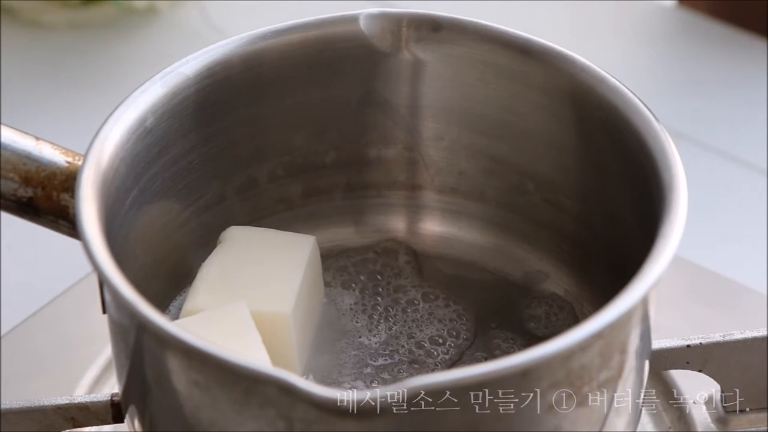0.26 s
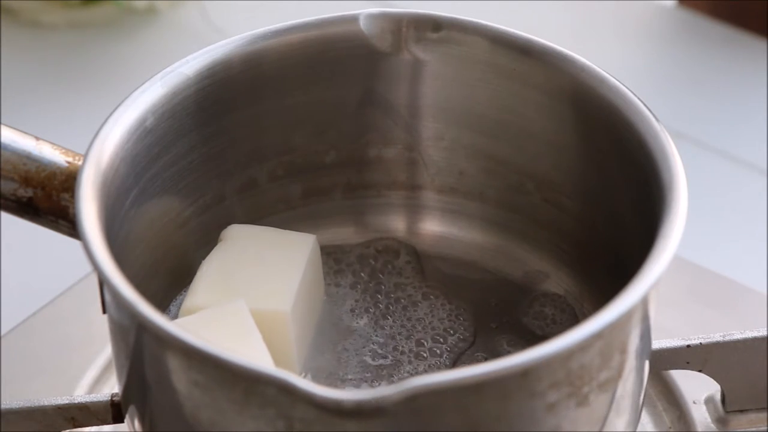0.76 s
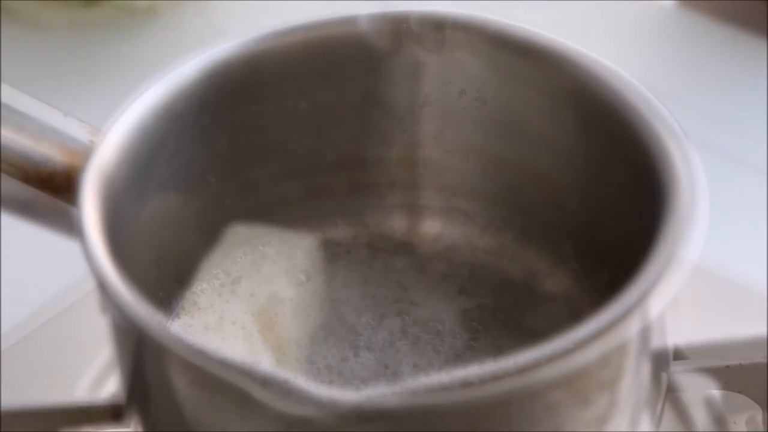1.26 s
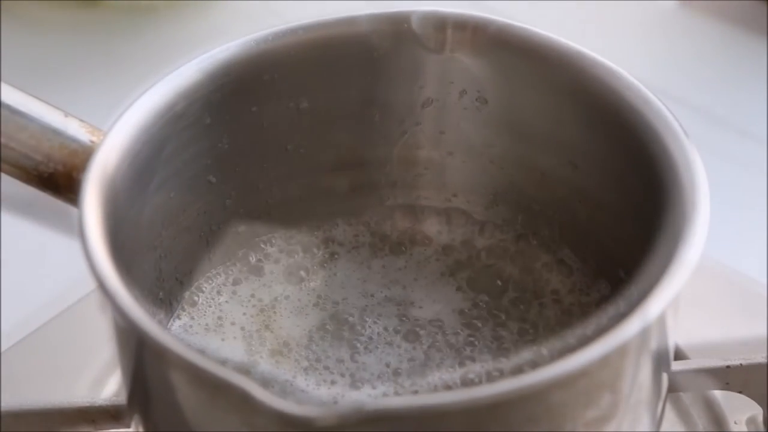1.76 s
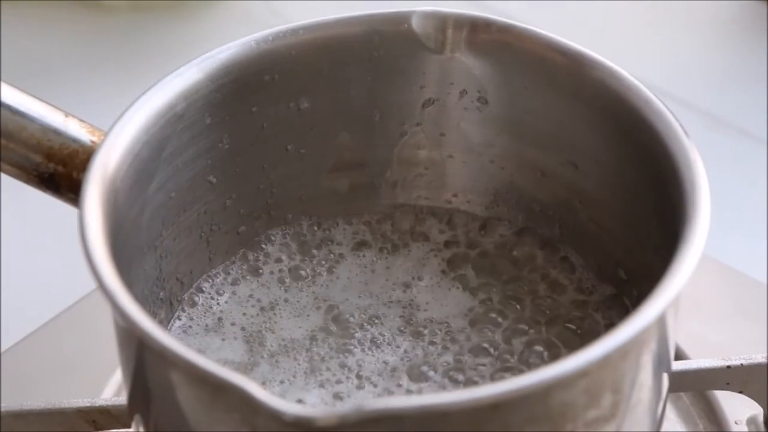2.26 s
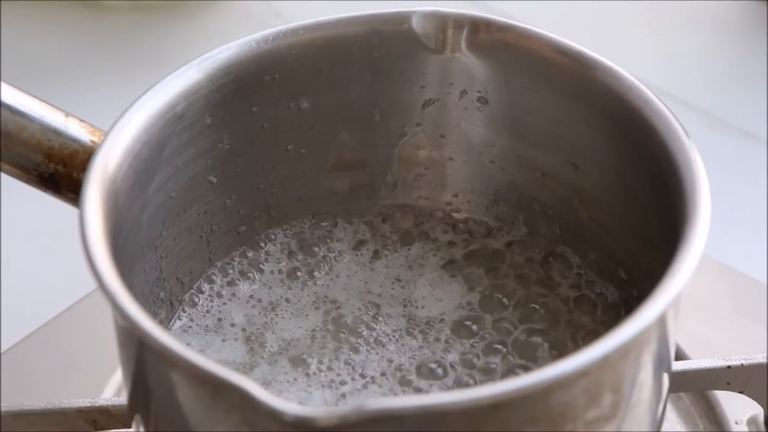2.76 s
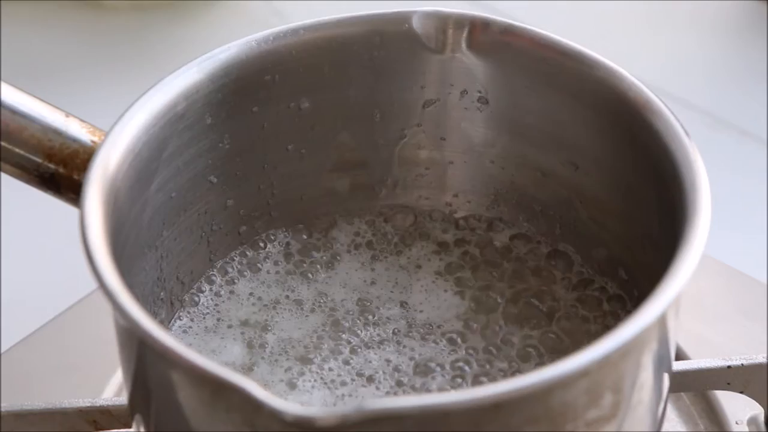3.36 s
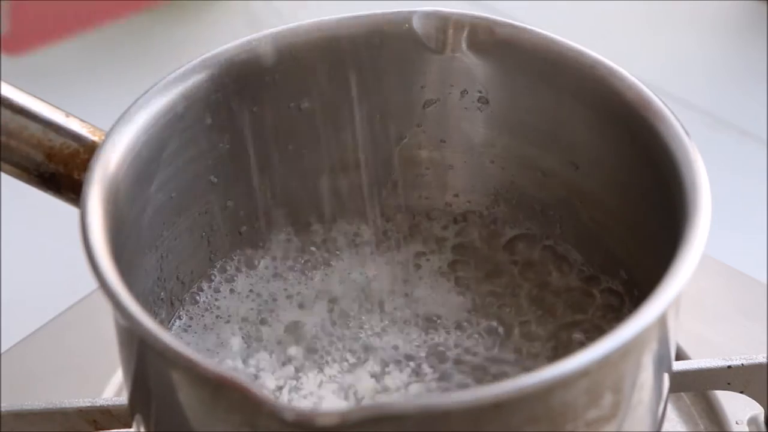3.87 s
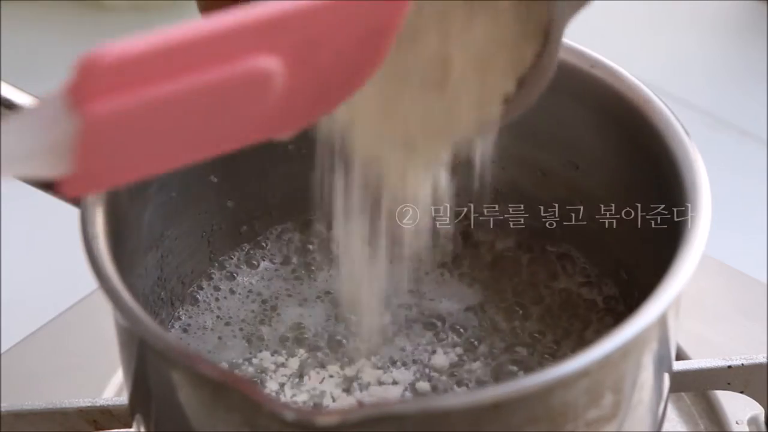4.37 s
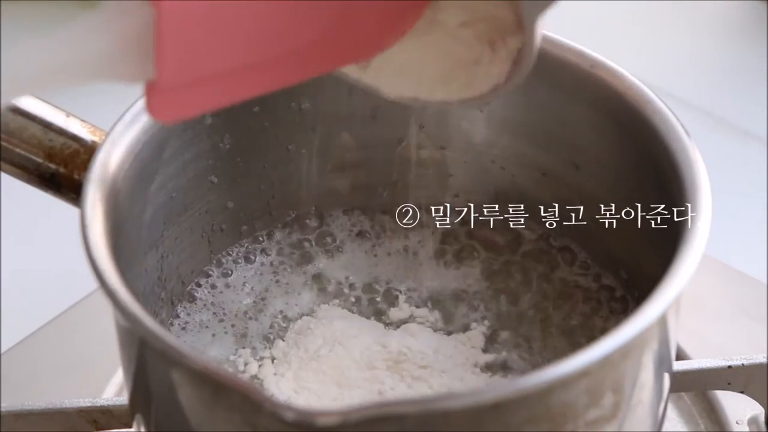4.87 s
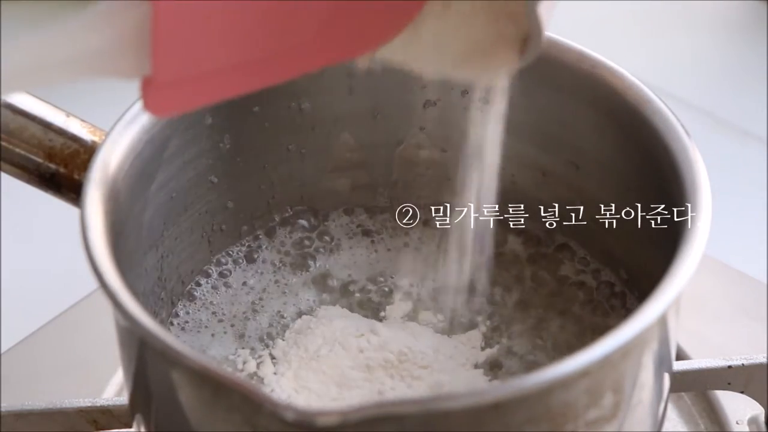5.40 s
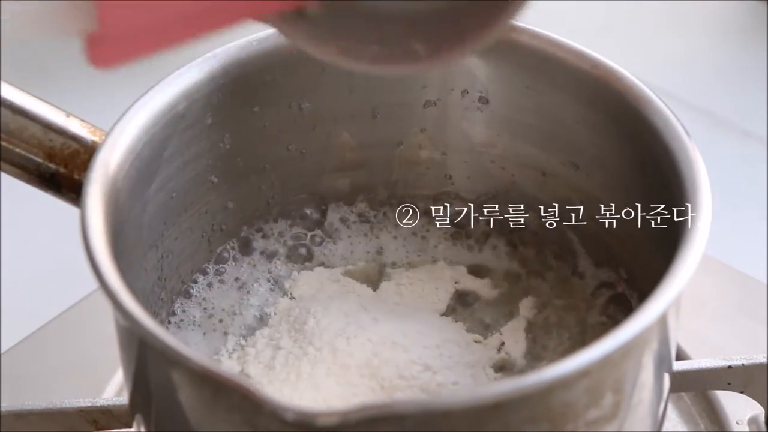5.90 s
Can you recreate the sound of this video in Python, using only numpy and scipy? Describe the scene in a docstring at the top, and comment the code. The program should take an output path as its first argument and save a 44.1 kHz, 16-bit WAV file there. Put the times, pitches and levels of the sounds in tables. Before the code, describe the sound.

Close, faint sizzling of melting butter builds to a busy bubbling fizz in a steel pan, with sharp spits and one light metal tick.

```python
"""In a kitchen, butter sizzles in a small steel saucepan on a stove, close to a stereo microphone.
A thin, spitting hiss of steam gives way to a growing foam. Each bursting bubble is a tiny tone,
and thousands of them make the hollow of the pan ring. Single pops, sharp spits, one tick of metal
and a few soft thuds stand out over the rush of the burner and the rumble of the house."""
import sys
import numpy as np
from scipy import signal
from scipy.fft import irfft
from scipy.io import wavfile
from scipy.ndimage import uniform_filter1d

SR = 44100
rng = np.random.default_rng(int(sys.argv[2]) if len(sys.argv) > 2 else 0)


def put_to_file(sound):
    """Save the sound as 16-bit audio at rate SR, in the file named by the first command-line argument."""
    columns = np.atleast_2d(sound).T  # one column per channel
    safe = np.clip(columns, -1, 1)
    whole_steps = np.round(safe * 32767)
    wavfile.write(sys.argv[1], SR, whole_steps.astype(np.int16))


N = 270774
TIME = np.arange(N) / SR

# How far the hiss and low rush have shifted from their thin opening tone to their fuller later tone.
# Each row: time in seconds, share of the later tone (0 to 1).
TONE_BLEND = [(0.9, 0.05), (2.0, 0.81)]
# Bubbles that stand out. Each row: time in seconds, peak level in dB, pitch in Hz.
POPS = [(0.3111, -46, 1920), (0.433, -46, 1700), (0.4337, -48.5, 740), (0.4385, -53, 3200),
        (0.6564, -47, 1800),  (0.8833, -56, 2030), (1.1215, -45, 3700), (1.1835, -47, 3760),
        (1.2926, -48, 3510), (1.3825, -49, 2170), (1.4337, -48, 3500), (1.4485, -39, 3510),
        (1.4492, -50, 2110), (1.483, -41, 4260), (1.5686, -41, 3430), (1.644, -38, 3920),
        (1.7115, -34.5, 3640), (1.7633, -38, 4400), (1.7684, -41, 2440), (1.8566, -46, 2310),
        (1.9545, -49, 1040), (2.008, -30, 4170), (2.0503, -34, 5600), (2.058, -26.5, 5360),
        (2.0846, -46, 3750), (2.184, -45, 2140), (2.218, -33, 4100), (2.3605, -42, 2370),
        (2.4655, -36, 2180), (2.5156, -29, 3430), (2.5221, -30, 3100), (2.6125, -46.5, 734),
        (2.6201, -40, 2310), (2.7971, -25, 3650), (2.814, -27.5, 3230), (2.817, -36, 2150),
        (2.8408, -46, 830), (2.933, -33.5, 1880), (2.9333, -46, 3370), (3.0935, -24, 3670),
        (3.0956, -22, 4100), (3.1876, -37, 820), (3.1873, -29, 2140), (3.2334, -30.5, 1780),
        (3.2333, -21.5, 3380), (3.2753, -25, 3400), (3.2738, -27, 5460), (3.3196, -26, 3370),
        (3.3268, -24.5, 3210), (3.3493, -38.5, 810), (3.351, -25.5, 2000), (3.4202, -25, 2950),
        (3.438, -30, 3500), (3.4493, -41, 3560), (3.5915, -29, 3220), (3.618, -30, 3900),
        (3.691, -25, 5600), (3.6932, -39, 2820), (3.7555, -22, 3760), (3.7663, -36.5, 696),
        (3.7754, -14.5, 3270), (3.7758, -24, 5050), (3.784, -37, 3240), (3.8054, -27, 3130),
        (3.8941, -30, 2900), (3.8944, -24, 1670), (3.8945, -31.5, 740), (3.914, -36, 3220),
        (3.9219, -44, 1790), (3.9895, -34, 7800), (3.999, -26.5, 3100), (4.026, -21, 3090),
        (4.0303, -26, 3200), (4.0396, -25, 3230), (4.1006, -27, 3030), (4.2133, -22, 3030),
        (4.2555, -26.5, 3400), (4.2924, -28, 1840), (4.3003, -28, 3270), (4.3184, -37, 3160),
        (4.3404, -27, 3530), (4.3459, -42, 3650), (4.4286, -26, 3780), (4.4499, -38, 650),
        (4.4731, -24, 3700), (4.4752, -23.5, 2810), (4.478, -19, 3150), (4.5096, -23, 3260),
        (4.5156, -30, 3250), (4.5395, -41, 970), (4.5417, -21.5, 2030), (4.5458, -22.5, 1900),
        (4.587, -35, 1230), (4.59, -32, 1750), (4.6161, -21, 3870), (4.683, -29, 3360), (4.6902, -36, 3120),
        (4.7227, -28, 3180), (4.718, -33, 5910), (4.7858, -24.5, 3040), (4.7882, -34, 7940),
        (4.8122, -23, 3240), (4.8318, -24, 3400), (4.86, -25, 3100), (4.934, -24.5, 2960),
        (4.942, -33, 2370), (5.0325, -24.5, 3750), (5.1317, -41, 3180), (5.1614, -28, 3030),
        (5.1683, -30, 2230), (5.1898, -28, 3330), (5.231, -24.5, 3660), (5.3183, -35, 2600),
        (5.329, -26, 3120), (5.3964, -25, 3220), (5.503, -23, 3600), (5.54, -30, 3200), (5.545, -33, 690),
        (5.635, -29, 3200), (5.6443, -30, 3100), (5.669, -25, 2240), (5.678, -38, 920), (5.794, -25, 2160),
        (5.946, -24, 2960), (5.967, -23, 2360), (5.9717, -37.5, 840), (5.9874, -17.5, 3400),
        (5.9946, -22, 3600), (6.102, -23, 2110), (6.1117, -28, 3240)]


def gain_of(db):
    """Turn decibels into a factor to multiply a sound by."""
    return 10 ** (np.asarray(db) / 20)


def add_power(db, power):
    """The level in dB once extra power is added."""
    return 10 * np.log10(gain_of(db) ** 2 + power)


def unit_level(x):
    """Scale a signal to an average power of 1."""
    return x / np.sqrt(np.mean(x ** 2) + 1e-20)


def at_pitch(rows, hz):
    """Read a table of (Hz, value) rows at any pitch."""
    row_hz, value = np.transpose(rows)
    return np.interp(np.log(hz + 1), np.log(row_hz + 1), value)


def curves(rows, t=TIME):
    """Join rows that start with a time into one curve for each other column."""
    times, *columns = np.transpose(rows)
    return [np.interp(t, times, column) for column in columns]


def frame_grid(size):
    """Times and pitches for overlapping slices of sound, each `size` samples long."""
    return np.arange(N // (size // 4) + 5) * size / 4 / SR, np.fft.rfftfreq(size, 1 / SR)


def stereo_noise(strength, size):
    """Noise with a given strength at each pitch (rows) and moment (columns)."""
    # Each row: pitch in Hz, how alike left and right are (0 to 1).
    likeness = [(60, 1), (150, 0.61), (380, 0.91), (950, 0.84), (2380, 0.48), (5980, 0.056), (15000, 0.013)]
    alike = at_pitch(likeness, np.fft.rfftfreq(size, 1 / SR))[:, None]
    a, b, c, d = rng.standard_normal((*strength.T.shape, 4)).T
    left = a + 1j * b
    right = alike * left + np.sqrt(1 - alike ** 2) * (c + 1j * d)
    spectrum = np.array([left, right]) * strength
    return signal.istft(spectrum, nperseg=size, noverlap=size * 3 // 4)[1][:, :N]


def patchy_noise(opening_tone, later_tone, patchy_db, size):
    """Noise with drifting patches; it shifts from its opening tone toward its later tone."""
    t, hz = frame_grid(size)
    patches = rng.standard_normal((len(t), len(hz))).T
    patches = unit_level(uniform_filter1d(uniform_filter1d(patches, 8, 0), 10, 1))
    blend = curves(TONE_BLEND, t)[0]
    opening, later = (unit_level(gain_of(at_pitch(tone, hz)))[:, None] for tone in (opening_tone, later_tone))
    power = (1 - blend) * opening ** 2 + blend * later ** 2
    return unit_level(stereo_noise(np.sqrt(power) * gain_of(patchy_db * patches), size))


def puff_power(t, start, db, fade_s, rise_s=0.0012):
    """The power of a puff that swells quickly, then drops 60 dB in fade_s."""
    age = np.maximum(t - start, 0)
    return (1 - np.exp(-age / rise_s)) * gain_of(db - 60 * age / fade_s) ** 2


def bursts(start, db, hz, cycles, balance_db, lag_s, size, glide=0.022):
    """Tiny tones that peak after `cycles` swings and glide upward; one side hears each a little later."""
    out, step = np.zeros((2, N)), np.arange(size)
    samples = np.floor(start * SR).astype(int)[:, None] - 8 + step
    end_fade = np.minimum((size - step) / 20, 1)
    for side, sign in enumerate((.5, -.5)):
        swings = np.maximum(samples / SR - (start + sign * lag_s)[:, None], 0) * hz[:, None]
        progress = swings / cycles
        swell = (progress * np.exp(1 - progress)) ** 2 * end_fade
        tone = np.sin(2 * np.pi * swings * (1 + glide * progress))
        wave = swell * tone * gain_of(db + sign * balance_db)[:, None]
        out[side] = np.bincount(np.maximum(samples, 0).ravel(), wave.ravel(), N)[:N]
    return out


def placed_bursts(peak_s, db, hz, cycles, size):
    """Bursts that peak at the given times, each at a random place in the pan."""
    place = rng.standard_normal((len(peak_s), 2))
    start = peak_s - np.ravel(cycles) / hz
    return bursts(start, db, hz, cycles, 1.4 * place[:, 0], 2e-5 * place[:, 1], size)


def swarm(level_db, lowest_hz, spread, cycles, uneven_db, clump, count, size):
    """A crowd of bubbles that ring at lowest_hz or above and come in clumps as the foam heaves."""
    pick = rng.random(count)
    smallness, strength = rng.exponential(1, (count, 2)).T
    place = rng.standard_normal((count, 2))
    t = np.arange(0, N / SR, 1e-3)
    heave = unit_level(sum(np.sin(2 * np.pi * (hz * t + rng.random())) for hz in np.geomspace(8, 60, 30)))
    burst_so_far = np.cumsum(np.exp(clump * heave))
    start = np.interp(pick, burst_so_far / burst_so_far[-1], t)
    floor_hz = np.broadcast_to(lowest_hz, N)[(start * SR).astype(int)]
    hz = np.minimum(floor_hz * np.exp(spread * smallness), 15000)
    db = uneven_db * np.minimum(strength, 3.5)
    db -= 2.5 * np.maximum(smallness - 1.5, 0)  # the smallest bubbles are fainter
    crowd = bursts(start, db, hz, cycles, 3.9 * place[:, 0], 4.5e-5 * place[:, 1], size)
    return unit_level(crowd) * gain_of(level_db)


def house_rumble():
    """The deep noise of the house."""
    # Each row: time in seconds, level in dB.
    loudness = [(0.0, -68), (0.08, -66), (2.19, -75.5), (2.22, -77), (2.33, -72), (2.56, -71.5),
                (4.04, -66), (5.45, -65), (5.56, -59), (5.58, -62), (5.93, -67.5), (6.14, -64)]
    # Each row: pitch in Hz, relative level in dB.
    tone = [(12, -34), (20, -0.5), (81, 7.5), (199, -4.5), (220, -42), (290, -18), (480, -120)]
    return patchy_noise(tone, tone, patchy_db=1.0, size=4096) * gain_of(curves(loudness)[0])


def kitchen_echo(sound):
    """The room's echo, heard as noise: each pitch lingers and dies at its own speed."""
    # Each row: pitch in Hz, seconds to fade by 60 dB.
    fade_times = [(300, 0.51), (3000, 0.09), (12000, 0.2)]
    hz, _, spectrum = signal.stft(np.pad(sound.mean(0), (0, 512)), SR, nperseg=256, noverlap=192)
    kept = gain_of(-60 * 64 / SR / at_pitch(fade_times, hz)) ** 2  # power left after one 64-sample step
    power = [signal.lfilter([0, 0, 0, 1 - k], [1, -k], band) for k, band in zip(kept, abs(spectrum) ** 2)]
    return gain_of(-1.0) * stereo_noise(np.sqrt(power), size=256)


def stove_thuds():
    """Soft knocks that come through the stove top."""
    # Each row: start in seconds, peak level in dB, pitch in Hz.
    knocks = [(2.226, -54.5, 172), (3.73, -49, 330), (3.894, -45, 333), (4.42, -50, 375), (4.585, -47, 297),
              (5.538, -46.5, 150)]
    start, db, hz = np.transpose(knocks)
    centred = np.zeros(len(start))
    return bursts(start, db, hz, cycles=0.95, balance_db=centred, lag_s=centred, size=2048, glide=0)


def burner_and_slosh(heavy_below_hz=1350):
    """Low noise of the flame under the pan, and of fat sloshing after the heaviest bubbles."""
    # The flame. Each row: time in seconds, level in dB.
    flame = [(0.0, -56), (0.38, -58), (0.91, -61.5), (1.59, -64), (2.27, -59.5), (2.37, -58.5),
             (3.18, -55.5), (3.38, -53), (3.71, -52.5), (4.26, -51), (4.67, -49), (5.33, -50), (5.71, -47),
             (6.14, -48.5)]
    # Its tone at first and later on. Each row: pitch in Hz, relative level in dB.
    opening_tone = [(120, -44), (200, -56), (247, 2.5), (373, -2.5), (420, -13.5), (474, -2), (615, -11),
                    (694, -1), (1160, -14.5), (1470, -1.5), (1800, -12.5), (2200, -15), (2860, -21),
                    (4840, -120)]
    later_tone = [(120, -41), (200, -15), (243, -13), (403, -10.5), (771, 1.5), (1080, -3.5), (1500, -11.5),
                  (1950, 0.5), (3300, -120)]
    slosh = sum(puff_power(TIME, at, db - 6.5, fade_s=0.13) for at, db, hz in POPS if hz < heavy_below_hz)
    level_db = add_power(curves(flame)[0], slosh)
    return patchy_noise(opening_tone, later_tone, patchy_db=1.0, size=1024) * gain_of(level_db)


def metal_tick(start=3.8941, level_db=-22):
    """A tool taps thin metal close by, which gives a short, bright ring."""
    # Each row: pitch in Hz, relative level in dB, seconds to fade by 60 dB.
    tones = [(6900, -4, .0025), (10200, 0, .003), (13300, 1, .002), (15200, -6, .002)]
    age = np.maximum(TIME - start, 0)
    return sum(gain_of(level_db + db - 60 * np.minimum(age / fade_s, 5)) * np.sin(2 * np.pi * hz * age)
               for hz, db, fade_s in tones)


def surge_power(large_bubbles=False, lean=0.12):
    """Patches of foam collapse at once: each is a swell of power that rises quicker than it falls."""
    # Each row: middle in seconds, length in seconds, level of medium bubbles in dB,
    # dB to add for large bubbles.
    patches = [(1.09, 0.093, -61, -18), (1.284, 0.077, -57.5, -12), (1.464, 0.055, -56.5, -3),
               (1.566, 0.04, -53, -13), (1.744, 0.082, -49, -11), (1.853, 0.031, -51.5, -4),
               (1.971, 0.11, -45.5, -10.5), (2.057, 0.0078, -41, -22), (2.196, 0.091, -50.5, -5),
               (2.366, 0.1, -46.5, -6), (2.508, 0.098, -45, -7), (2.819, 0.024, -50, 0),
               (3.096, 0.012, -43, -7), (3.228, 0.017, -39, -11), (3.333, 0.024, -40.5, -21),
               (3.429, 0.14, -40.5, -9.5), (3.607, 0.072, -39.5, -23), (3.698, 0.018, -37.5, -9),
               (3.789, 0.087, -36.5, -9), (3.908, 0.046, -40, -5), (4.035, 0.028, -38, -12),
               (4.101, 0.02, -37, -7.5), (4.2, 0.076, -43.5, -22), (4.345, 0.013, -51, -10),
               (4.433, 0.02, -39, -10), (4.479, 0.0082, -41, -12), (4.514, 0.033, -38.5, -8),
               (4.609, 0.084, -38.5, -7.5), (4.685, 0.011, -42, -5), (4.827, 0.098, -38, -6),
               (4.941, 0.017, -41, 2.5), (5.071, 0.058, -37.5, -6), (5.162, 0.12, -39.5, -7),
               (5.322, 0.045, -36.5, -12), (5.398, 0.048, -38, -2.5), (5.522, 0.071, -40, -15),
               (5.653, 0.054, -40, 1), (5.991, 0.012, -33, -15), (6.11, 0.048, -40, -2.5)]
    power = np.zeros(N)
    for middle, length, db, large_db in patches:
        near = slice(*np.searchsorted(TIME, [middle - 2 * length, middle + 3 * length]))
        from_peak = (TIME[near] - middle) / length + lean / 2
        swell = np.exp(-4 * (from_peak / (1 + lean * np.sign(from_peak))) ** 2)
        power[near] += gain_of(db + large_db if large_bubbles else db) ** 2 * swell
    return power


def steam():
    """Steam leaves the fat with a fine hiss and crackle, swelling when foam collapses."""
    # Each row: time in seconds, level in dB.
    loudness = [(0.0, -55.5), (0.29, -61.5), (0.66, -63.5), (0.87, -68), (0.93, -64.5), (1.55, -64.5),
                (1.9, -62.5), (2.26, -57), (2.43, -57.5), (2.89, -55.5), (3.45, -55), (3.79, -50.5),
                (5.06, -49.5), (5.18, -47.5), (5.99, -43), (6.14, -43.5)]
    # The hiss at first and later on. Each row: pitch in Hz, relative level in dB.
    opening_tone = [(1060, -37), (1800, -21), (2320, -0.5), (3850, -3), (8100, -5), (12000, -7),
                    (15700, -10.5)]
    later_tone = [(3530, -17.5), (6000, -1.5), (7610, -3.5), (8180, -6), (10700, -10.5), (13000, -17),
                  (15500, -41)]
    level_db = add_power(curves(loudness)[0], surge_power() * gain_of(-15) ** 2)
    hiss = patchy_noise(opening_tone, later_tone, patchy_db=2.86, size=256) * gain_of(level_db)
    crackle_hz = 8000 - 2000 * curves(TONE_BLEND)[0]
    crackle = swarm(level_db - 11.5, crackle_hz,
                    spread=0.23, cycles=2.0, uneven_db=1.4, clump=0.32, count=9000, size=48)
    return hiss + crackle


def spits(delay_s=0.000654, low_hz=2300, size=128):
    """Water drops flash to steam: each makes a click with a dying puff of hiss behind it."""
    # Each row: time in seconds, click level in dB, puff level in dB, pitch of both in Hz.
    drops = [(0.0633, -39, -53, 10700), (0.0757, -43, -66, 3970), (0.1386, -38, -58, 10400),
             (0.2094, -46, -59, 7100), (0.311, -46, -63, 4000), (0.3282, -31, -51, 11200),
             (0.3358, -34, -54, 11400), (0.4144, -49, -62, 9600), (0.4324, -44, -63, 4500),
             (0.4594, -43, -69, 13400), (0.532, -37, -56.5, 8300), (0.5955, -44, -56, 10900),
             (0.6155, -50, -58, 12500), (0.635, -32, -58, 11100), (0.6566, -44, -61, 4000),
             (0.7253, -41, -61, 9500), (0.7776, -54, -64, 9000), (0.8894, -43, -55, 10100),
             (0.9313, -43, -58, 7600), (1.0595, -47, -64, 9200), (1.1034, -49, -56.5, 12700),
             (1.2295, -51, -60, 11300), (1.477, -40, -53, 7240), (1.5396, -55, -69, 12500),
             (1.559, -48, -67, 7800), (1.5765, -42, -54, 6960), (1.7524, -42, -53.5, 12100),
             (1.8574, -44, -59, 12100), (2.0492, -34, -52, 6400), (2.055, -40, -59, 8400),
             (2.0926, -46, -71, 12200), (2.2036, -48, -58, 9700), (2.2294, -45, -70, 10100),
             (2.404, -33, -58, 7900), (2.7337, -44, -53, 9800), (2.8459, -38, -57, 9200),
             (3.1338, -44, -45, 9100), (3.273, -35, -51, 8350), (3.5423, -42, -51, 8900),
             (3.5553, -39, -50, 11000), (3.6296, -32, -45, 10700), (3.7668, -40, -43, 11200),
             (3.9888, -39, -55, 10500), (4.0178, -38, -55, 12600), (4.0816, -30, -51, 8600),
             (4.1245, -36, -59, 9100), (4.164, -31, -42, 6600), (4.4169, -47, -43, 11400),
             (5.031, -26, -38, 7300), (5.1786, -35, -45, 9600), (5.3388, -33, -54, 8800),
             (5.8321, -33, -44, 8600)]
    t, hz = frame_grid(size)
    hz = hz + 1  # avoids dividing by zero
    power = np.zeros((len(hz), len(t)))
    for at, _, puff_db, pitch in drops:
        peak = np.exp(-.5 * (np.log(hz / pitch) / 0.1) ** 2)
        band = 1 / (1 + (low_hz / hz) ** 6) / (1 + (hz / pitch / 1.25) ** 4)  # ends just above the pitch
        tone = unit_level(peak + gain_of(8) * band)
        power += np.outer(tone ** 2, puff_power(t, at + delay_s, puff_db, fade_s=0.22))
    plain_level = stereo_noise(np.ones((len(hz), 400)), size)[:, :10000].std()
    puffs = stereo_noise(np.sqrt(power), size) / plain_level
    times, click_db, _, click_hz = np.transpose(drops)
    return puffs + placed_bursts(times + delay_s, click_db, click_hz, cycles=0.7, size=64)


def gurgle():
    """Melted fat gurgles in a few low tones."""
    # Each row: time in seconds, peak level in dB, pitch in Hz.
    glugs = [(3.4, -47, 520), (3.47, -45, 674), (3.49, -47, 670), (3.515, -50, 780), (3.55, -45, 790),
             (3.576, -41.5, 720), (3.609, -43, 720), (4.79, -44, 520), (4.81, -56, 480)]
    return placed_bursts(*np.transpose(glugs), cycles=4.6, size=2048)


def pops():
    """Single bubbles burst above the crowd; small, high ones ring for more swings."""
    # Each row: pitch in Hz, swings until the peak.
    ring_cycles = [(800, 1.17), (2200, 1.57), (3200, 3.794)]
    times, db, hz = np.transpose(POPS)
    return placed_bursts(times, db, hz, at_pitch(ring_cycles, hz)[:, None], size=384)


def foam():
    """Bursting foam: medium bubbles, a dense fine fizz above them and fewer large ones below."""
    # The foam between surges. Each row: time in seconds, level of medium bubbles in dB,
    # their typical pitch in Hz, level of fizz in dB, level of large bubbles in dB.
    growth = [(0.86, -70, 3270, -70, -76), (1.18, -63.5, 3600, -59, -70), (1.95, -52, 3440, -47, -63.5),
              (2.12, -53, 3500, -47.5, -64), (2.28, -53, 3560, -46.5, -62), (2.36, -55, 3520, -46.5, -61),
              (2.67, -45, 3570, -41.5, -56), (3.14, -41, 3520, -39, -53), (3.27, -41.5, 3480, -39.5, -54),
              (3.3, -49, 3470, -45, -56), (3.33, -44, 3540, -41.5, -55), (3.57, -44, 3540, -42.5, -50),
              (3.93, -46.5, 3350, -40, -50), (4.2, -42.5, 3300, -38, -49.5), (4.34, -45, 3500, -40, -50.5),
              (4.9, -41.5, 3180, -44, -46), (5.4, -41, 3250, -38.5, -46), (5.51, -38, 3430, -38, -40.5),
              (5.57, -41.5, 2960, -37.5, -42.5), (5.95, -38, 3050, -37.5, -40),
              (5.98, -39, 3100, -38.5, -40), (6.05, -40, 3220, -36.5, -39), (6.14, -35.5, 2800, -38, -40.5)]
    medium_db, hz, fizz_db, large_db = curves(growth)
    fade_in_db = -300 * np.clip(growth[0][0] - TIME, 0, 1)  # the foam starts from nothing
    surge = surge_power()
    medium_db = add_power(medium_db + fade_in_db, surge)
    fizz_db = add_power(fizz_db + fade_in_db, surge * gain_of(-2.5) ** 2)
    large_db = add_power(large_db + fade_in_db, surge_power(large_bubbles=True))
    medium = swarm(medium_db, 0.863 * hz,
                   spread=0.16, cycles=2.31, uneven_db=1.7, clump=.45, count=9000, size=128)
    fizz = swarm(fizz_db, 3650, spread=0.224, cycles=3.05, uneven_db=2.05, clump=.25, count=21000, size=88)
    large = swarm(large_db, 1750, spread=0.27, cycles=1.48, uneven_db=0.99, clump=.3, count=6500, size=176)
    return medium + fizz + large


def pan_ring(sound, ring_db=4.5):
    """The air in the pan and its steel wall ring along; flour shifts which tones are strongest."""
    # Each row: pitch in Hz, width in Hz, relative level in dB over bare fat, the same with flour in.
    tones = [(252, 13, -7.5, -5.5), (381, 7.9, 2.5, -6), (438.6, 10, -2, 2.5), (499, 15, -3, 1.5),
             (550, 22, -7.5, -10), (607, 6.2, -2, 3), (658, 6.7, 1.5, 1), (687, 11.4, 0.5, -2),
             (736.5, 13, -2, -6), (791, 13, -2, -2), (853, 26, -0.5, 0), (961, 15, -6.5, 2),
             (1003, 27, 2, -2), (1154, 20, 6, -1), (1227, 39, -1.5, -0.5), (1352, 17, -2, -4),
             (1423, 16, -8.5, 1), (1568, 25, -9, -5.5), (1715, 34, -3.5, 2.5), (1761, 15, 1.5, -3.5),
             (1892, 35, -6, -8.5), (1984, 13, -18, -10), (2095, 25, -9, -8.5), (2152, 27, -3, -14),
             (2310, 32, 3, -3), (2367, 40, -0.5, -3.5), (2465, 18, -14, -1), (2500, 29, -11, -4),
             (2706, 35, 2, 0.5), (2900, 33, -10, -5), (3000, 75, -5, -3), (3150, 30, -3.5, -4),
             (3280, 49, -4.5, -4), (3517, 24, -5, -7), (3660, 40, -15, -4.5), (4250, 9.9, -18, -8),
             (4760, 38, -5, -6)]
    # The flour. Each row: time in seconds, share of the pan filled (0 to 1).
    filling = [(3.0, 0), (4.6, 0.86)]
    hz = np.fft.rfftfreq(4096, 1 / SR)
    filled = curves(filling)[0]
    out = 0
    for share, column in ((1 - filled, 2), (filled, 3)):
        ringing = sum(gain_of(row[column]) / (1 + 2j * (hz - row[0]) / row[1]) for row in tones)
        response = irfft(1 + gain_of(ring_db) * ringing)
        out = out + signal.oaconvolve(share * sound, response[None], axes=1)[:, :N]
    return out


def scene():
    """Bubbles and burner ring through the pan; steam, spits and the tick bypass it. All of these echo."""
    fat = foam() + pops() + gurgle() + burner_and_slosh()
    vapour = steam() + spits()
    tick = metal_tick()
    open_air = vapour + tick + kitchen_echo(vapour + gain_of(-5) * tick)
    pan = gain_of(-3.5) * pan_ring(fat + kitchen_echo(fat))
    return pan + open_air + house_rumble() + stove_thuds()


def record(dry, top_hz=15700):
    """Cut away the highest treble."""
    return signal.oaconvolve(dry, signal.firwin(511, top_hz, window=("kaiser", 9), fs=SR)[None], "same")


dry = scene()
out = record(dry)
put_to_file(out)
```